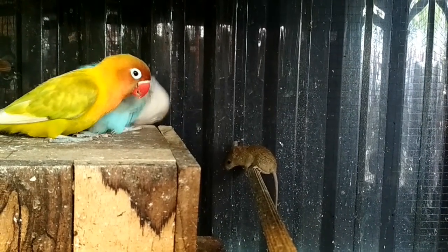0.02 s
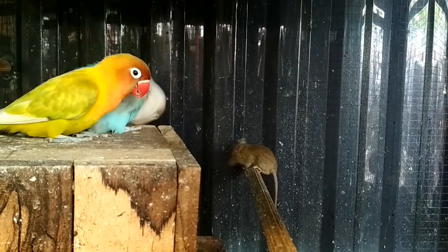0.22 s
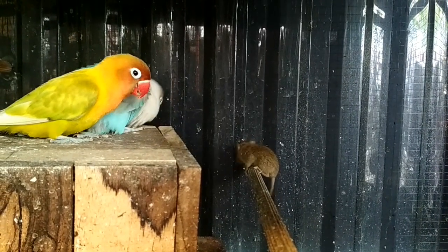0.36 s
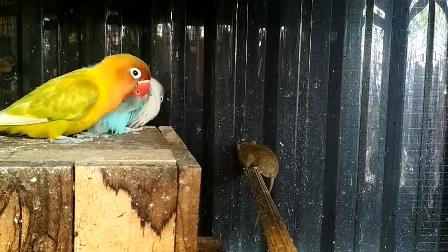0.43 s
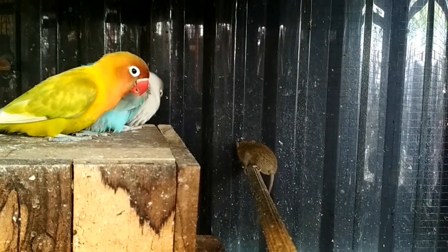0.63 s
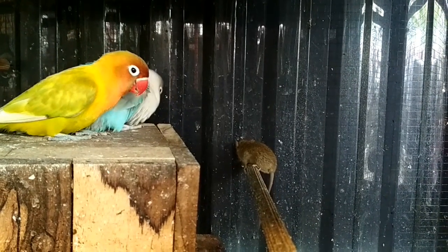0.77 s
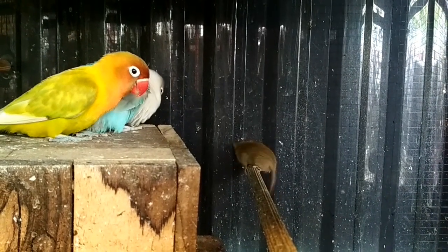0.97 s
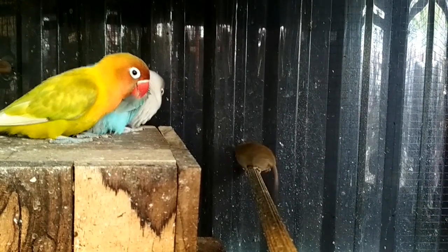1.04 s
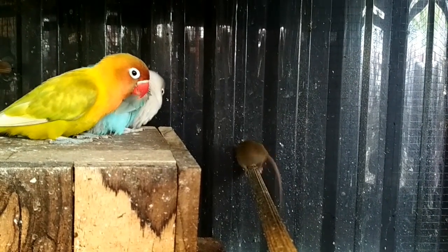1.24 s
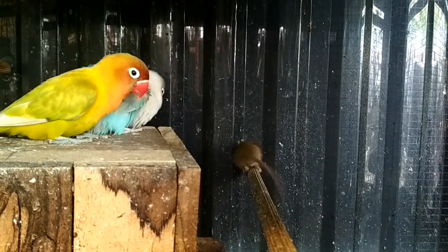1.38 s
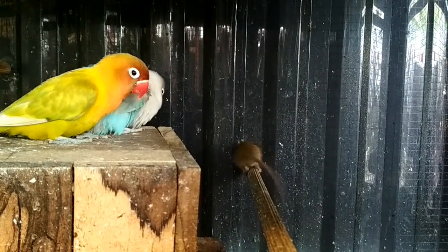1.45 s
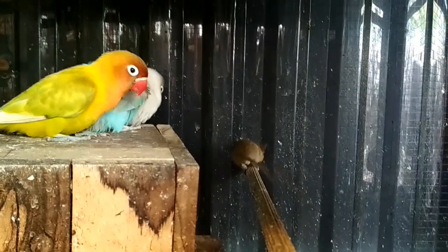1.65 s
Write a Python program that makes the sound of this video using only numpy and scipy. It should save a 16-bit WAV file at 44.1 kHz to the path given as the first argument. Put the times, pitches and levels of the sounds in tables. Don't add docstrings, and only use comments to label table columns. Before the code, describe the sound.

Two short high hoarse squeaks from a mouse, with light claw ticks and rustling in an enclosure

```python
import sys
import numpy as np
from scipy import signal
from scipy.fft import rfft, irfft, next_fast_len
from scipy.io import wavfile
from scipy.ndimage import uniform_filter1d, map_coordinates

SR = 44100
rng = np.random.default_rng(int(sys.argv[2]) if len(sys.argv) > 2 else 0)


def natural_amplitude(level_db):
    exponent = np.asarray(level_db, float) / 20
    return 10 ** exponent


def to_wav(s):
    ch = np.atleast_2d(s).T
    pcm = np.round(np.clip(ch, -1, 1) * 32767)
    wavfile.write(sys.argv[1], SR, pcm.astype(np.int16))


N = 74970


def unit(x):
    return x / np.sqrt(np.mean(x ** 2) + 1e-20)


def along(points, hz):
    f, v = np.transpose(points)
    return np.interp(np.log(hz + 1), np.log(f + 1), v)


def curve(rows, outside=None):
    s, v = np.transpose(rows)
    return np.interp(np.arange(N) / SR, s, v, outside, outside)


def wobble(rate):
    return map_coordinates(rng.standard_normal(N // 10), [np.arange(N) * rate / SR])


def filtered(x, response):
    m = next_fast_len(N + SR // 2)
    return irfft(rfft(x, m) * response(np.fft.rfftfreq(m, 1 / SR)), m)[..., :N]


def panned(x, pan):
    return filtered(x, lambda hz: natural_amplitude(along(pan, hz) * np.array([[.5], [-.5]])))


def narrow(centre_hz, width_hz):
    return unit(filtered(rng.standard_normal(N), lambda hz: 1 / (1 + ((hz - centre_hz) / width_hz * 2) ** 4)))


# frequency in Hz, left-right likeness from 0 to 1.
LIKENESS = [(60, 1), (150, 0.89), (380, 0.81), (950, 0.13), (2380, -0.0), (5980, 0), (15000, 0.02)]
# frequency in Hz, left over right in dB.
BACKGROUND_PAN = [(60, 2), (240, -0.5), (950, 4.0), (3770, 2), (15000, -7.5)]


def rush(spectrum, patchy_db):
    z = signal.stft(rng.standard_normal((2, N)), nperseg=512)[2]
    patches = uniform_filter1d(rng.standard_normal(z.shape[1:]), 6, 0)
    patches = unit(uniform_filter1d(patches, 10, 1))
    pair = signal.istft(z * natural_amplitude(patchy_db * patches), nperseg=512)[1][:, :N]

    def mid_side(hz):
        turn = np.arccos(np.clip(along(LIKENESS, hz), -1, 1)) / 2
        return natural_amplitude(along(spectrum, hz)) * np.array([np.cos(turn), np.sin(turn)])

    mid, side = filtered(pair, mid_side)
    return unit(panned(np.array([mid + side, mid - side]), BACKGROUND_PAN))


# time in seconds, hum level in dB.
HUM_LEVEL = [(0.0, -68), (0.028, -59), (0.118, -73), (0.16, -51.5), (0.828, -51), (1.088, -80),
             (1.116, -61.5), (1.292, -59.5), (1.376, -73), (1.42, -50.5), (1.496, -42.5), (1.556, -56),
             (1.656, -57), (1.7, -62)]


def hum():
    tone_hz, tone_share = 111, .7
    wandering_hz = tone_hz + 1.76 * wobble(6.54)
    tone = np.sqrt(2) * np.sin(2 * np.pi * np.cumsum(wandering_hz) / SR)
    low = tone_share * tone + (1 - tone_share) * narrow(centre_hz=116, width_hz=14)
    drone = natural_amplitude(-60.5) * narrow(centre_hz=168.7, width_hz=31)
    return natural_amplitude(curve(HUM_LEVEL) - 2.0) * low + drone


# frequency in Hz, density in dB per Hz.
AIR_SPECTRUM = [(13, -46), (22, -8), (48, -10.5), (72, -19.5), (113, -6), (240, -13), (570, -16.5),
                (7000, -26.5), (9100, -38), (15400, -120)]
# time in seconds, gain in dB.
AIR_GAIN = [(0, 3.5), (.12, 3), (.3, 2), (.7, 0.24), (1.2, 0.8), (1.37, 2.5), (1.5, 1.85), (1.7, 2.4)]


def air_rumble():
    level_db = -51.5 + curve(AIR_GAIN) + 0.29 * wobble(8.4)
    return natural_amplitude(level_db) * rush(AIR_SPECTRUM, patchy_db=1.0)


# frequency in Hz, density in dB per Hz.
HISS_SPECTRUM = [(3530, -33), (6000, -14.5), (8070, -10.5), (11900, 0), (15100, -7.5), (15800, -9)]
# time in seconds, hiss level in dB.
RUSTLE_LEVEL = [(0.0, -49.5), (0.208, -50.5), (0.344, -52.5), (0.576, -54.5), (1.06, -50), (1.7, -52.5)]


def feather_hiss():
    level_db = curve(RUSTLE_LEVEL) + 4.0 + 1.7 * wobble(39.55)
    return natural_amplitude(level_db) * rush(HISS_SPECTRUM, patchy_db=2.5)


# start in seconds, peak level in dB, left over right in dB.
CLAW_TICKS = [(0.0094, -28.5, -11), (0.0664, -32.5, -12), (0.2013, -24.5, -10), (0.5018, -36, -14),
              (0.5506, -36, -21), (0.9522, -37, -14), (0.9842, -30.5, -4.0), (1.0857, -27.5, -7),
              (1.1333, -32.5, -10), (1.2442, -34.5, -9), (1.3014, -35, -11)]


def ticks():
    t60_s, gain_db = 0.038, -6.5
    spectrum = [(3000, -12.5), (7000, -17.5), (11000, 0.3), (15000, -2.5)]  # (Hz, dB)
    out, t = np.zeros((2, N + SR)), np.arange(SR // 10) / SR
    for s, db, pan_db in CLAW_TICKS:
        burst = rng.standard_normal(len(t)) + 1.14 * rng.standard_normal((2, len(t)))
        decay = natural_amplitude(db + gain_db - 60 * t / t60_s)
        sides = natural_amplitude([[pan_db / 2], [-pan_db / 2]])
        out[:, round(s * SR):][:, :len(t)] += decay * burst * sides
    return filtered(out[:, :N], lambda hz: natural_amplitude(along(spectrum, hz)))


# start in seconds, level in dB, t60 in seconds.
FOOT_SCUFFS = [
    (.083, -36.5, 0.083),
    (.29, -37.5, 0.15),
    (1.34, -51, 0.13),
]
# frequency in Hz, density in dB per Hz.
SCUFF_SPECTRUM = [(200, -14), (700, -2.5), (2000, -5), (3500, -2.5), (9000, -14), (16000, -30)]


def scuffs():
    t, shape = np.arange(N) / SR, np.zeros(N)
    for s, db, t60_s in FOOT_SCUFFS:
        onset = np.clip((t - s) / 0.0095, 0, 1)
        shape += natural_amplitude(db - 60 * abs(t - s) / t60_s) * onset
    return shape * rush(SCUFF_SPECTRUM, patchy_db=1.2)


REGISTER_BREAKS_HZ = [3100, 3700, 8000]


def voice(notes, note_db, registers, rasp_db, throat):
    attack_s, release_s = 0.0028, 0.0089
    twin_db = -7.5
    t, out = np.arange(N) / SR, np.zeros(N)
    jitter = 1 + .009 * wobble(250)
    skid = 1 + .09 * np.abs(wobble(650))
    smear = [(.3 * wobble(450), .3 * wobble(450)) for _ in range(5)]
    for (s, length_s, hz0, hz1), db in zip(notes, note_db):
        pitch_hz = np.interp(t, [s, s + length_s], [hz0, hz1])
        phase = 2 * np.pi * np.cumsum(pitch_hz * jitter) / SR
        twin_phase = 2 * np.pi * np.cumsum(pitch_hz * skid) / SR
        ramps = np.minimum((t - s) / attack_s, (s + length_s - t) / release_s)
        shape = np.clip(ramps, 0, 1) ** 2
        overtone_db = registers[np.searchsorted(REGISTER_BREAKS_HZ, hz1)]
        stack = np.zeros(N)
        for k, (g, (a, b)) in enumerate(zip(overtone_db, smear), 1):
            overtone = (1 + a) * np.sin(k * phase) + b * np.cos(k * phase)
            stack += natural_amplitude(g) * (overtone + natural_amplitude(twin_db) * np.sin(k * twin_phase))
        out += natural_amplitude(db + 3) * shape * stack
    rasp = unit(filtered(rng.standard_normal(N), lambda hz: natural_amplitude(along(throat, hz))))
    flutter_db = 3 * wobble(300)
    return natural_amplitude(flutter_db) * (out + rasp * natural_amplitude(rasp_db))


# start in seconds, length in seconds, start pitch in Hz, end pitch in Hz.
LOUD_NOTES = [
    (.204, .026, 2540, 2660),
    (.222, .036, 2700, 2725),
    (.234, .032, 3330, 3540),
    (.256, .036, 4430, 4400),
    (.266, .034, 4230, 4270),
    (.292, .03, 4420, 4390),
    (.285, .05, 4900, 4760),
    (.3, .035, 5000, 5250),
    (.216, .05, 12750, 12760),
]
LOUD_NOTE_DB = [-35, -28, -29.5, -18, -22, -26.5, -30, -36.5, -33.5]
LOUD_REGISTERS = [
    (-5, 1.5, -6, 1, -1),
    (-10.5, 2, -19, -12, -40),
    (2.26, -8.5, -6, -42, -43),
    (-4, -90, -90, -90, -90),
]
# time in seconds, turbulence level in dB.
RASP_LEVEL = [
    [(0.195, -48.5), (0.243, -21.5), (0.279, -32), (0.34, -52)],
    [(0.535, -79), (0.555, -36), (0.565, -42), (0.611, -42.5), (0.617, -36), (0.65, -82)],
]
# frequency in Hz, throat gain in dB.
LOUD_THROAT = [(2300, -31), (3000, -10.5), (4200, -0.5), (6200, 6.2), (8000, -11), (10500, 3.5),
               (14000, 0.5), (15800, -35)]


def loud_squeak():
    notch_hz, notch_width_hz = 3780, 420
    rasp_db = curve(RASP_LEVEL[0], -120) + 3.5
    loud = voice(LOUD_NOTES, LOUD_NOTE_DB, LOUD_REGISTERS, rasp_db, LOUD_THROAT)
    return filtered(loud, lambda hz: 1 - 1 / (1 + ((hz - notch_hz) / notch_width_hz * 2) ** 4))


# frequency in Hz, t60 in seconds.
WALL_T60 = [(2000, .16), (5000, .21), (12000, .17)]


def walls(x):
    tail_db, early_db, early_s = -4.5, -4, .012
    hz, t, z = signal.stft(rng.standard_normal((2, SR // 2)), SR, nperseg=256)
    decay = natural_amplitude(-60 * t / along(WALL_T60, hz)[:, None])
    tail = signal.istft(z * decay, SR, nperseg=256)[1]
    tail = natural_amplitude(tail_db) * tail / np.linalg.norm(tail[0])
    lags = (rng.uniform(.05, 1, (2, 6)) * early_s * SR).astype(int)
    early = np.zeros(tail.shape)
    early[np.arange(2)[:, None], lags] = natural_amplitude(early_db) * rng.uniform(-0.73, 1, (2, 6))
    return signal.fftconvolve(x[None], tail + early, axes=1)[:, :N]


# frequency in Hz, left over right in dB.
SQUEAK_PAN = [(60, 5), (180, -2), (550, -1), (1650, 3.5), (4970, -1.5), (15000, -8)]


def enclosed(x):
    lag_s = np.array([[0], [0.0002906]])
    direct = filtered(x, lambda hz: natural_amplitude(-0.5) * np.exp(-2j * np.pi * hz * lag_s))
    return panned(direct + walls(x), SQUEAK_PAN)


# start in seconds, level in dB.
BOX_THUDS = [
    (0.226, -55.5),
    (.38, -52),
    (.49, -53.5),
    (.65, -54),
    (1.36, -60.5),
]
# mode frequency in Hz, level in dB, t60 in seconds.
BOX_MODES = [(279.8, 9.2, 0.24), (325, 7, 0.14), (467.5, 0, 0.2)]


def knocks():
    knock_s, knock_hz, knock_db = 1.696, 605, -31.5
    out, t = np.zeros(N + SR), np.arange(SR // 3) / SR
    ring = sum(natural_amplitude(g - 60 * t / t60_s) * np.sin(2 * np.pi * hz * t) for hz, g, t60_s in BOX_MODES)
    ring = ring * (1 - np.exp(-t / 0.0066))
    for s, db in BOX_THUDS:
        out[round(s * SR):][:len(t)] += natural_amplitude(db) * ring
    knock = np.sin(2 * np.pi * knock_hz * t) * (1 - np.exp(-t / 0.0021))
    out[round(knock_s * SR):][:len(t)] += natural_amplitude(knock_db) * knock
    return out[:N] * natural_amplitude([[1.5], [-1.5]])


# start in seconds, length in seconds, start pitch in Hz, end pitch in Hz.
TURNED_NOTES = [
    (.539, .024, 2520, 2880),
    (.551, .014, 3600, 3500),
    (.567, .032, 4020, 4300),
    (.592, .02, 2620, 2640),
    (.6, .022, 4100, 3850),
    (.615, .03, 3800, 4000),
    (.93, .07, 3050, 2950),
]
TURNED_NOTE_DB = [-43, -50.5, -36, -41.5, -42, -41, -64.5]
TURNED_REGISTERS = [
    (-0.4, -6.5, -4, -1, -24),
    (-8, 10.3, -8, -12, -40),
    (-0.1, -4, -4.5, -40, -40),
    (0.1, -90, -90, -90, -90),
]
# frequency in Hz, throat gain in dB.
TURNED_THROAT = [(2300, -34), (3200, -0.5), (4400, -7), (5800, -15), (7500, 1), (10500, -1.5), (13000, 0),
                 (15800, -33)]


def soft_squeak():
    rasp_db = curve(RASP_LEVEL[1], -120) - 0.5
    return voice(TURNED_NOTES, TURNED_NOTE_DB, TURNED_REGISTERS, rasp_db, TURNED_THROAT)


def scene():
    loud, soft = loud_squeak(), soft_squeak()
    squeaks = enclosed(loud) + enclosed(soft)
    contacts = hum() + knocks() + ticks() + scuffs()
    return squeaks + contacts + air_rumble() + feather_hiss()


def band_limit(x):
    return signal.sosfilt(signal.butter(12, 15990, fs=SR, output="sos"), x)


def record(dry):
    limit, knee = .9, 4
    held = dry / (1 + np.abs(dry / limit) ** knee) ** (1 / knee)
    return band_limit(held)


dry = scene()
out = record(dry)
to_wav(out)
```